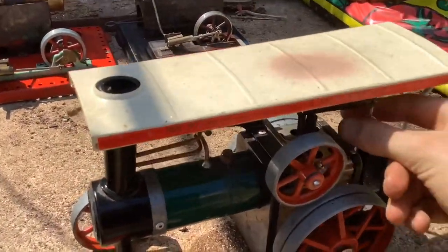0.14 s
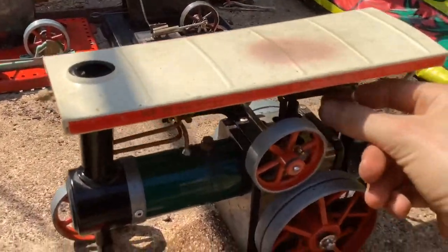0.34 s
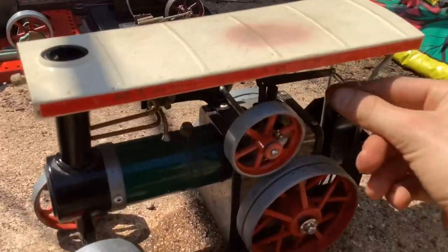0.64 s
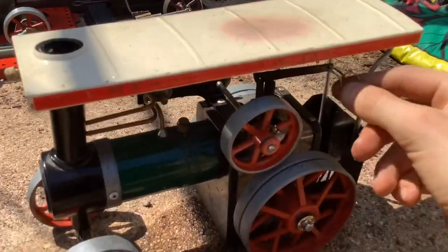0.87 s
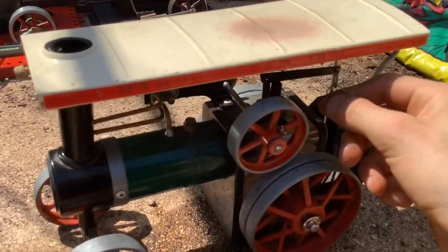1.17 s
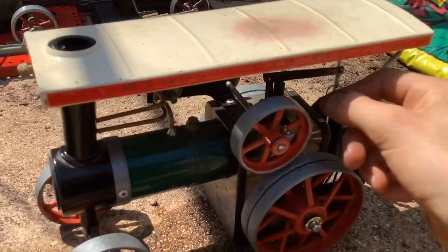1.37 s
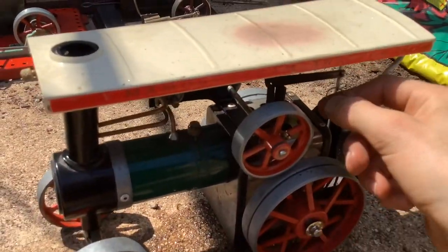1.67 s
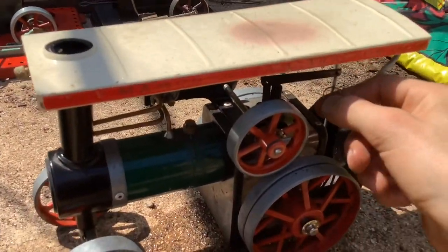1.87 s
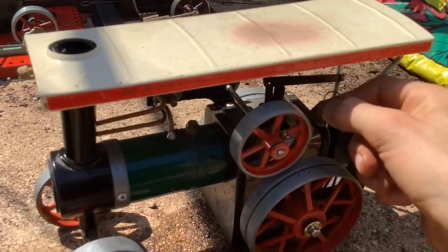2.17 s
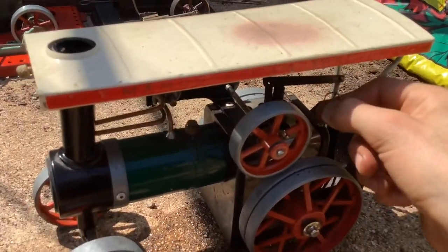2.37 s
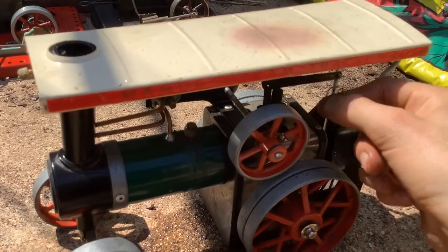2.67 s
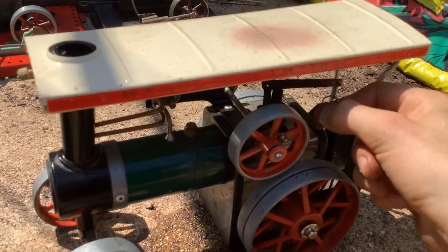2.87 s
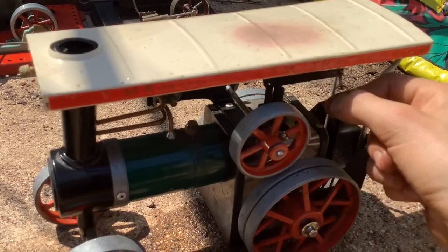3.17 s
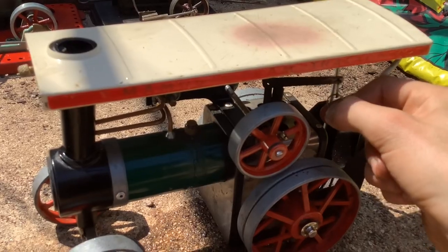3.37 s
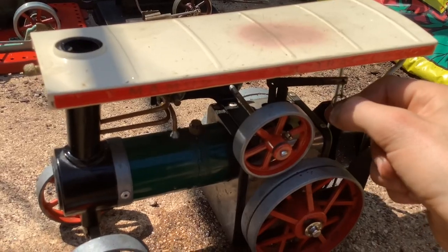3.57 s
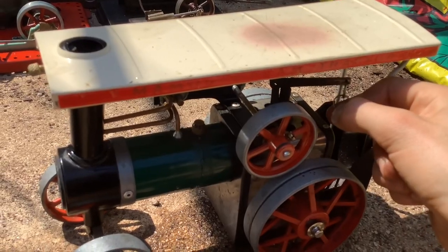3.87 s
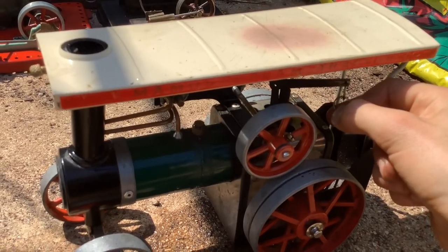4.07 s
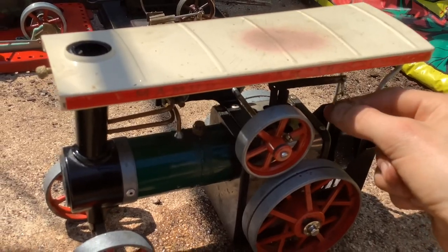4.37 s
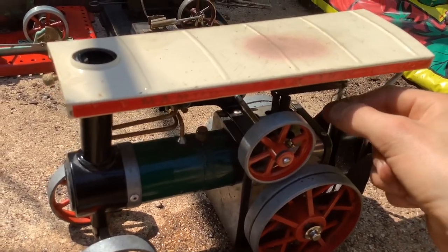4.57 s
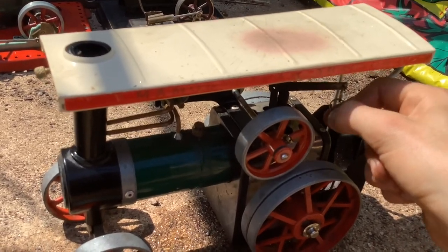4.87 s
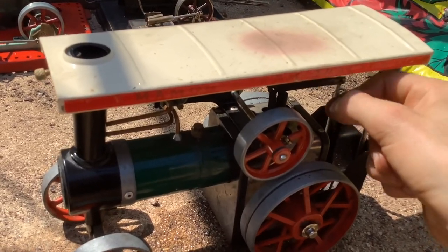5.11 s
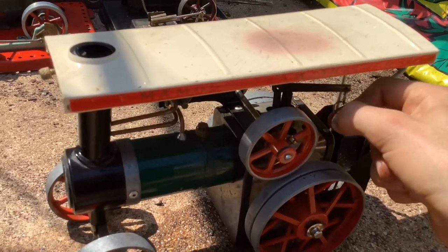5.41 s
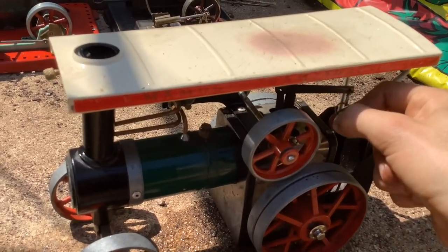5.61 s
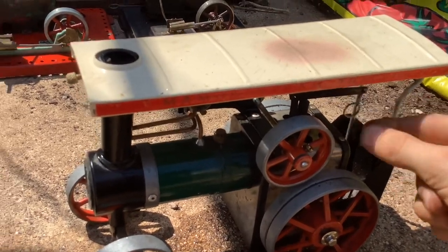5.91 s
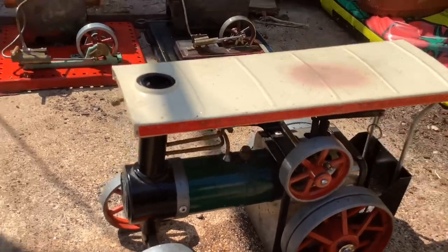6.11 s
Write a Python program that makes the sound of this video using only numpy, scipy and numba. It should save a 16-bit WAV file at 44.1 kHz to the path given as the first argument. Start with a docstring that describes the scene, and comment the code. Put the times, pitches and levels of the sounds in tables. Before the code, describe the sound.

A tiny steam engine chuffs about seventeen times a second in an open yard, its crank ticking between puffs. After hand bumps on the camera and a cluster of hard knocks, steam sputters and a shrill miniature whistle blows six separate toots, short and long, wrapped in bright hiss. The pitch wavers and sags as pressure falls. The close, dry mono pickup turns itself down under the whistle; low rumble and a far hum remain.

```python
"""In a yard outdoors, a model steam engine ticks over while a hand works its tiny whistle.
The engine is puffed, resonant noise and decaying knocks; low rumble and a far two-partial hum lie behind it.
Wet steam spits, coloured noise, then six shrill toots from a rough swept tone turn flat, weak and breathy.
The loud whistle makes the camera turn its gain down, so the engine sinks into the background; a hand bumps the camera."""
import sys
import numpy as np
from scipy import signal
from scipy.fft import rfft, irfft, next_fast_len
from scipy.io import wavfile
from scipy.ndimage import uniform_filter1d, map_coordinates
from numba import njit

SR = 44100
rng = np.random.default_rng(int(sys.argv[2]) if len(sys.argv) > 2 else 0)


def unload_audio(sound):
    """Save the sound as a 16-bit wav file, at the path given as the first command line argument."""
    columns = np.transpose(np.atleast_2d(sound))
    # keep every value between -1 and 1, then stretch to whole-number steps
    steps = np.round(np.clip(columns, -1, 1) * 32767)
    wavfile.write(sys.argv[1], SR, steps.astype(np.int16))


N = 275625

# Spectrum of moving outdoor air. Each row: frequency in Hz, relative density in dB.
AIR_SPECTRUM = [(25, -24.5), (45, -7), (65, 1.5), (100, 2.5), (160, 0.5), (260, -9.5), (600, -17),
                (1200, -20), (4000, -36.5)]


def amp(db):
    """Decibels to gain."""
    return 10 ** (np.asarray(db) / 20)


def unit(x):
    """Scale to rms 1."""
    return x / np.sqrt(np.mean(np.abs(x) ** 2) + 1e-20)


def curves(rows):
    """One value per sample for each column after the time."""
    s, *cols = np.transpose(rows)
    return [np.interp(np.arange(N) / SR, s, c) for c in cols]


def gate(start_s, rise_s, hold_s, fall_s):
    """An envelope from 0 to 1 and back."""
    corners_s = start_s + np.cumsum([0, rise_s, hold_s, fall_s])
    return np.interp(np.arange(N) / SR, corners_s, [0, 1, 1, 0])


def wobble(knots_per_s):
    """A smooth random curve of rms 1."""
    knots = rng.standard_normal(N // 8)
    return unit(map_coordinates(knots, [np.arange(N) * knots_per_s / SR], mode="wrap"))


def filtered(x, response):
    """Filter x by a response given as a function of frequency in Hz."""
    m = next_fast_len(N + SR // 2)
    return irfft(rfft(x, m) * response(np.fft.rfftfreq(m, 1 / SR)), m)[..., :N]


def noise(spectrum):
    """Noise of rms 1 coloured by (Hz, dB) points, log-spaced between them."""
    f, db = np.transpose(spectrum)

    def colour(hz):
        return amp(np.interp(np.log(hz + 1), np.log(f), db, left=-120, right=-120))

    return unit(filtered(rng.standard_normal(N), colour))


def ringing(x, modes):
    """x with (centre Hz, width Hz, dB) resonances added to it."""
    def response(f):
        return 1 + sum(amp(db) * 1j * f * w / (c * c - f * f + 1j * f * w) for c, w, db in modes)

    return filtered(x, response)


def add(track, s, sound):
    """Mix a sound into a track at s seconds."""
    part = track[max(round(s * SR), 0):][:len(sound)]
    part += sound[:len(part)]


def yard(second_db=-16, swell_db=3.0):
    """Low outdoor rumble that swells and dies down, and a far hum that grows as it sinks in pitch."""
    # Each row: time in seconds, hum frequency in Hz, level of its first partial in dB.
    hum_path = [(0, 130, -63), (1.3, 130.8, -53.5), (3.2, 122.8, -49), (6.25, 122.3, -41.5)]
    start_db, fade_db_per_s = -54.5, 0.5
    hum_hz, hum_db = curves(hum_path)
    phase = 2 * np.pi * np.cumsum(hum_hz + 0.52 * wobble(6.1)) / SR
    partials = np.sin(phase) + amp(second_db) * np.sin(2 * phase)
    hum = amp(hum_db + 0.61 * wobble(4.6)) * partials
    rumble_db = start_db - fade_db_per_s * np.arange(N) / SR + swell_db * wobble(13)
    return hum + amp(rumble_db) * noise(AIR_SPECTRUM)


def handling(rise_s=0.0032, t60_s=0.082):
    """Dull bumps and scuffs of the hand that holds the camera: short decaying bursts of noise."""
    # Each row: start in seconds, thud gain in dB, scuff gain in dB.
    bumps = [(0.01, -33, -44), (0.182, -40, -49), (0.341, -34.5, -36.5), (0.389, -32, -46),
             (0.636, -37, -61), (0.773, -34, -52), (0.885, -35.5, -52), (1.75, -44, -34), (2.1, -40.5, -29),
             (5.729, -33, -33)]
    # Thud spectrum. Each row: frequency in Hz, relative density in dB.
    thud_spectrum = [(40, -31), (70, 1.5), (140, -0.5), (280, -9), (600, -33)]
    # Scuff spectrum. Each row: frequency in Hz, relative density in dB.
    scuff_spectrum = [(170, -4), (330, 1), (620, 4.5), (800, -22), (1400, -30)]
    t = np.arange(SR // 5) / SR
    push = (1 - np.exp(-t / rise_s)) * amp(-60 * t / t60_s)
    thuds, scuffs = np.zeros((2, N))
    for s, thud_db, scuff_db in bumps:
        add(thuds, s, amp(thud_db) * push)
        add(scuffs, s, amp(scuff_db) * push)
    return thuds * noise(thud_spectrum) + scuffs * noise(scuff_spectrum)


def beat_times(offset_turns):
    """The moments in seconds when the crank passes a given part of its turn."""
    # Crank position at the start of an exhaust beat. Each row: time in seconds, position in turns.
    crank_path = [(-.034, -1), (.502, 8), (1.781, 30), (3.214, 55), (5.113, 88), (6.258, 108)]
    s, turns = np.transpose(crank_path)
    return np.interp(np.arange(turns[-1]) + offset_turns, turns, s)


def exhaust(rise_s=0.0041, t60_s=0.0587, scatter_db=3.2):
    """One puff of steam a turn goes up the resonant chimney, over a continuous, slightly wavering leak."""
    # Puff spectrum. Each row: frequency in Hz, relative density in dB.
    puff_spectrum = [(200, -2), (700, -4), (1050, -3), (1400, -10), (2600, -5.5), (3400, -0.5),
                     (4200, -0.5), (5000, 0), (6000, -13), (6800, -3.5), (10800, -13), (11600, -12.5),
                     (12300, -27), (15500, -28)]
    # Leak spectrum. Each row: frequency in Hz, relative density in dB.
    leak_spectrum = [(150, -9.5), (300, 0.5), (700, -3), (1250, 3), (1420, -11.5), (2400, -4), (4700, -5),
                     (6100, -15), (6600, -7.5), (10500, -16), (11400, -8.5), (12000, -26), (14200, -25),
                     (15700, -29)]
    # Chimney resonances. Each row: centre in Hz, width in Hz, gain in dB.
    chimney_modes = [(802, 27, 1), (1611, 81, 10.5), (3330, 540, -18), (4430, 130, -11)]
    puff_db, leak_db = -46, -50
    t = np.arange(SR // 10) / SR
    puff = (1 - np.exp(-(t / rise_s) ** 2)) * amp(-60 * t / t60_s)
    flow = np.zeros(N)
    for s in beat_times(0):
        add(flow, s, puff * amp(scatter_db * rng.standard_normal()))
    puffs = amp(puff_db) * unit(flow) * noise(puff_spectrum)
    leak = amp(leak_db + 0.79 * wobble(70)) * noise(leak_spectrum)
    return ringing(puffs + leak, chimney_modes)


def knock(ring_db, click_db, click_t60_s=0.015, pin_hz=4650, pin_t60_s=0.02256, pin_db=-3):
    """Play in the crank closes with a click that rings the pin and the heavier metalwork."""
    # Metalwork modes before random scatter. Each row: frequency in Hz, gain in dB, t60 in seconds.
    metal_modes = [(1694, -17, 0.024), (2400, -9.5, 0.032), (2328, 6.5, 0.024), (2836, -18, 0.051)]
    t = np.arange(SR // 16) / SR
    ring = np.zeros(len(t))
    for hz, db, t60_s in metal_modes:
        decay = amp(db + rng.normal(0, 2) - 60 * t / t60_s)
        ring += decay * np.sin(2 * np.pi * hz * rng.normal(1, 0.011) * t)
    band = signal.butter(3, [3200, 8000], "bandpass", fs=SR, output="sos")
    click = signal.sosfilt(band, rng.standard_normal(len(t)) * amp(-60 * t / click_t60_s))
    pin = amp(pin_db - 60 * t / pin_t60_s) * np.sin(2 * np.pi * pin_hz * rng.normal(1, 0.026) * t)
    soft_start = 1 - np.exp(-t / 0.0015)
    return amp(ring_db) * ring * soft_start + amp(click_db) * (1.2 * click + pin)


def crank(tick_ring_db=-47, tick_click_db=-49, scatter_db=4):
    """The loose crank ticks about halfway between puffs, and now and then knocks hard."""
    # Loud knocks. Each row: start in seconds, ring gain in dB, click gain in dB.
    loud_knocks = [(0.5896, -31, -36), (0.644, -28.5, -27.5), (0.7036, -32.5, -30.5), (0.7627, -36, -28.5),
                   (0.82, -39, -25), (0.8797, -36, -28), (0.9996, -40, -29.5), (1.054, -31, -22.5),
                   (1.1102, -29.5, -34), (1.8942, -32, -33.5), (1.9545, -36, -34.5), (2.0047, -32, -24)]
    track = np.zeros(N)
    for s in beat_times(.48):
        ring_scatter_db, click_scatter_db = scatter_db * rng.standard_normal(2)
        add(track, s, knock(tick_ring_db + ring_scatter_db, tick_click_db + click_scatter_db))
    for s, ring_db, click_db in loud_knocks:
        add(track, s, knock(ring_db, click_db))
    return track


def reflections(x, size_db=-17, count=8):
    """Canopy and ground send back weak copies within a few milliseconds."""
    delays_s = rng.uniform(.002, .011, count)
    return filtered(x, lambda f: 1 + amp(size_db) * sum(np.exp(-2j * np.pi * f * d) for d in delays_s))


def valve():
    """Valve opening (0 shut, 1 open), with the tone dB and sizzle dB of the toot under way."""
    # Pulls on the whistle valve. Each row: start, opening, hold and closing time, all in seconds.
    toots = [(1.226, .021, .389, .028), (1.884, .076, .59, .024), (2.787, .017, .279, .021),
             (3.255, .022, .955, .028), (4.719, .035, .186, .036), (5.156, .016, .6, .04)]
    # Force of each pull. Each row: tone gain in dB, sizzle gain in dB.
    force = [(0, -28.5), (3, -26.5), (3, -28), (3.5, -28), (5.5, -24.5), (3.5, -25)]
    gates = np.array([gate(*toot) for toot in toots])
    tone_db, sizzle_db = np.array(force)[gates.argmax(axis=0)].T
    return gates.max(axis=0), tone_db, sizzle_db


def steam(opening, sizzle_db):
    """Steam rushes through the open valve and stirs the air; the first of it is wet and sputters."""
    # Rush spectrum. Each row: frequency in Hz, relative density in dB.
    rush_spectrum = [(60, -36), (150, -15), (550, -12.5), (1000, -23), (1900, -32), (2500, -18),
                     (3100, -8.5), (3500, -10.5), (4000, -20.5), (5000, -3), (5350, -7.5), (5900, -1.5),
                     (6600, 3), (7400, -26)]
    # Sizzle spectrum. Each row: frequency in Hz, relative density in dB.
    sizzle_spectrum = [(5500, -43.5), (6400, -18), (6700, 3), (7080, -7), (7350, 5), (8050, -0.5),
                       (8500, -7.5), (9700, -10), (11300, -9.5), (12100, -15), (12700, -17), (14000, -16.5),
                       (15700, -20)]
    # Wet steam spectrum. Each row: frequency in Hz, relative density in dB.
    wet_spectrum = [(300, -31), (2000, -27.5), (3100, -16), (3900, -26.5), (4700, -11.5), (6200, -23.5),
                    (7000, -8.5), (7700, -8.5), (8020, -23), (8280, 4), (8600, -9.5), (9500, -13.5),
                    (10100, -22), (11500, -21), (13000, -27.5), (15500, -27.5)]
    # Whistle body resonances under plain steam. Each row: centre in Hz, width in Hz, gain in dB.
    body_modes = [(5320, 91, -7.5), (5860, 200, -5.5), (7520, 57, -7.5), (8064, 170, 2), (9430, 300, -3.5),
                  (10570, 350, -6.5)]
    rush_db, spit_db, draught_db = -30.5, -31, -49
    jet = amp(rush_db) * noise(rush_spectrum) + amp(sizzle_db) * noise(sizzle_spectrum)
    jet = jet * np.sqrt(opening) * amp(1.2 * wobble(110))
    sputter = amp(1.3 * wobble(320))
    spit_gate = gate(start_s=1.05, rise_s=0.012, hold_s=0.15, fall_s=0.032)
    spit = amp(spit_db) * spit_gate * sputter * noise(wet_spectrum)
    # the draught blows on the microphone
    draught = amp(draught_db) * opening * noise(AIR_SPECTRUM)
    return ringing(jet + spit, body_modes) + draught


def whistle(opening, tone_db, choke_db=36, jitter_hz=9, waver_hz=8, flutter_db=0.63, tremble_db=0.43,
            line_hz=70, octave_db=-37):
    """A steam jet sings in a short pipe; a throttled or starved jet is flat, weak and rough."""
    # Pitch follows the steam pressure; one list per toot. Each row: time in seconds, pitch in Hz.
    pitch_path = [
        [(1.245, 6810), (1.255, 6830), (1.319, 6893), (1.635, 6882)],
        [(1.958, 6755), (2.004, 6920), (2.06, 6977), (2.456, 6920), (2.55, 6853)],
        [(2.805, 6716), (2.821, 6780), (2.963, 6896), (3.019, 6760), (3.085, 6680)],
        [(3.277, 6730), (3.379, 6827), (3.417, 6861), (3.451, 6700), (3.539, 6784), (3.571, 6678),
         (3.659, 6789), (3.843, 6624), (3.879, 6717), (4.001, 6600), (4.079, 6690), (4.232, 6575)],
        [(4.75, 6615), (4.786, 6680), (4.906, 6631), (4.945, 6480)],
        [(5.17, 6740), (5.202, 6648), (5.322, 6685), (5.38, 6547), (5.422, 6620), (5.482, 6452), (5.492, 6562),
         (5.772, 6420)],
    ]
    full_hz, starve_span_hz = 6664, 133  # full tone above the first, starved this far below it
    starved_loss_db = 10.5
    clean_rough, starved_rough = 0.071, 0.46  # turbulent share of a full and of a starved tone
    pitch_hz, = curves(np.vstack(pitch_path))
    throttle = 1 - opening
    starved = np.clip((full_hz - pitch_hz) / starve_span_hz, 0, 1)
    rough = np.clip(clean_rough * (1 - starved) + starved_rough * starved + throttle, 0, 1)
    sag = 1 - .32 * throttle ** 1.6 + .04 * throttle * wobble(700)
    sounding_hz = pitch_hz * sag + jitter_hz * wobble(260) + waver_hz * wobble(45)
    phase = 2 * np.pi * np.cumsum(sounding_hz) / SR
    # turbulence ringing in the pipe is a narrow noise round the pitch
    eddies = filtered(rng.standard_normal((2, N)), lambda f: 1 / (1 + 1j * f / line_hz) / (1 + 1j * f / 350))
    turbulence = unit(eddies[0] + 1j * eddies[1])
    wave = (np.sqrt(1 - rough ** 2) + rough * turbulence) * np.exp(1j * phase)
    # the pipe only speaks once enough steam flows
    speaks = np.clip((opening - .2) / .4, 0, 1)
    unsteady_db = flutter_db * wobble(90) + tremble_db * wobble(18)
    level = speaks * amp(tone_db - choke_db * throttle - starved_loss_db * starved + unsteady_db)
    return np.sqrt(2) * level * (wave + amp(octave_db) * wave ** 2).real


def echo(x, t60_s=0.26, wet_db=-28):
    """A faint, short answer from the walls round the yard: decaying noise convolved with x."""
    t = np.arange(SR // 2) / SR
    tail = rng.standard_normal(len(t)) * amp(-60 * t / t60_s) * (t > .006)
    return amp(wet_db) * signal.fftconvolve(x, tail / np.linalg.norm(tail))[:N]


def scene():
    """Yard, handling, engine and whistle, alike in both channels."""
    fade_db_per_s = 0.15  # the engine runs more softly as the boiler empties
    opening, tone_db, sizzle_db = valve()
    engine = amp(-fade_db_per_s * np.arange(N) / SR) * reflections(exhaust() + crank())
    near = whistle(opening, tone_db) + steam(opening, sizzle_db) + engine
    mono = near + echo(near) + handling() + yard()
    return np.array([mono, mono])


@njit
def follow(excess_db, attack, release_db):
    """Gain reduction in dB: it closes in on the excess level and lets go at a steady rate."""
    cut_db, now = np.zeros(len(excess_db)), 0.
    for i in range(len(excess_db)):
        now = max(now + max(excess_db[i] - now, 0.) * attack - release_db, 0.)
        cut_db[i] = now
    return cut_db


def turned_down(x, target_db, attack_s, release_db_per_s, look_ahead_s=0.003):
    """x with its gain lowered when its level, read slightly ahead, exceeds the target."""
    power = np.abs(uniform_filter1d(x[0] ** 2, size=128))
    t = np.arange(N) / SR
    level_db = np.interp(t + look_ahead_s, t, 10 * np.log10(power + 1e-12))
    return x * amp(-follow(level_db - target_db, 1 / (attack_s * SR), release_db_per_s / SR))


def record(dry):
    """The camera rides its gain, limits peaks, cuts the deep bass and keeps nothing above its band limit."""
    low_hz, top_hz = 54, 15830
    levelled = turned_down(dry, target_db=-20, attack_s=0.49, release_db_per_s=1.78)
    limited = turned_down(levelled, target_db=-13.5, attack_s=0.021, release_db_per_s=28.5)

    def band(hz):
        low_cut = 1 / np.sqrt(1 + (low_hz / (hz + 1)) ** 12)
        return low_cut * (hz < top_hz)

    return filtered(limited, band)


dry = scene()
out = record(dry)
unload_audio(out)
```